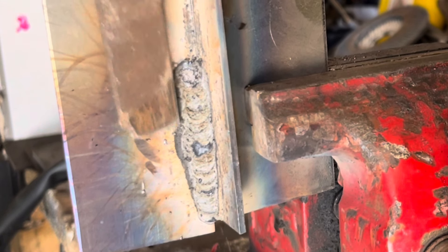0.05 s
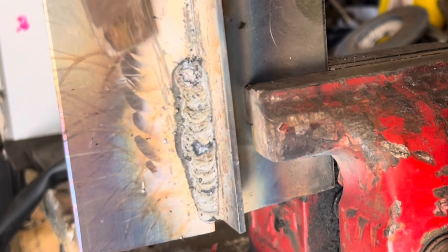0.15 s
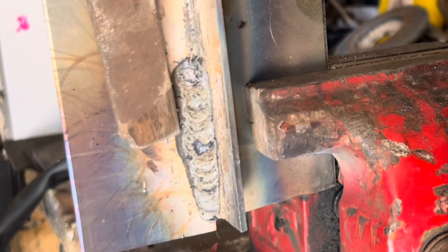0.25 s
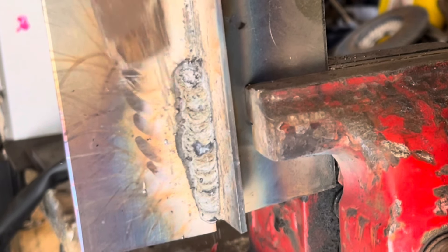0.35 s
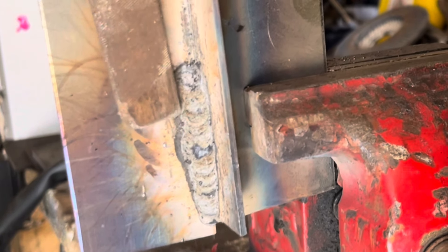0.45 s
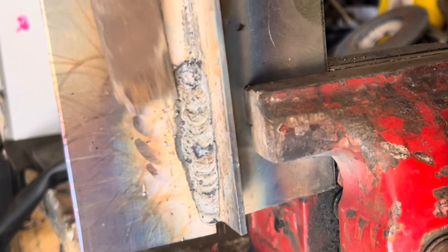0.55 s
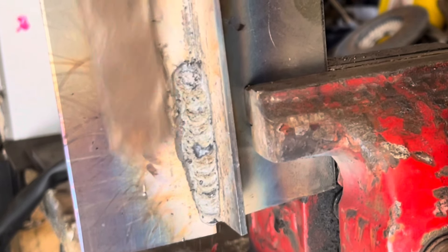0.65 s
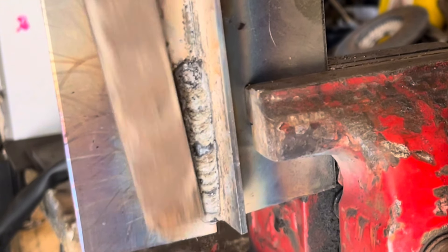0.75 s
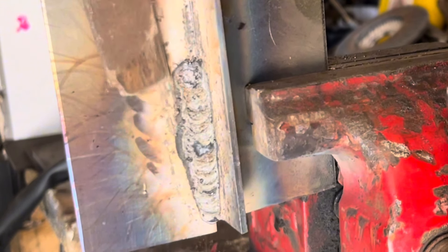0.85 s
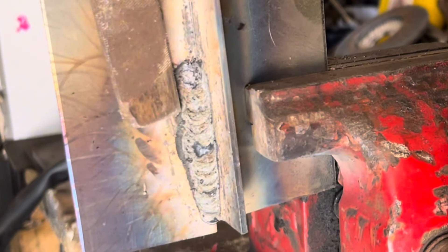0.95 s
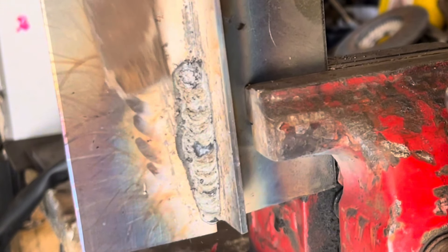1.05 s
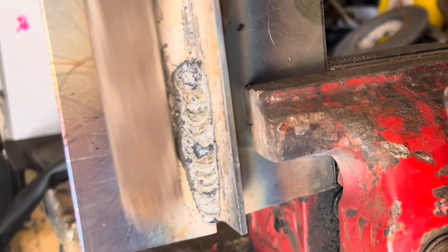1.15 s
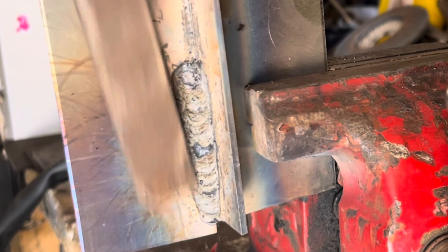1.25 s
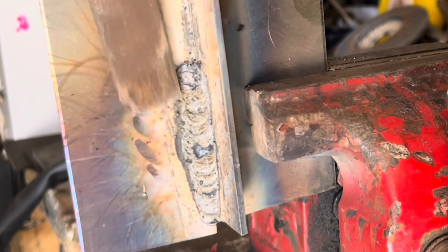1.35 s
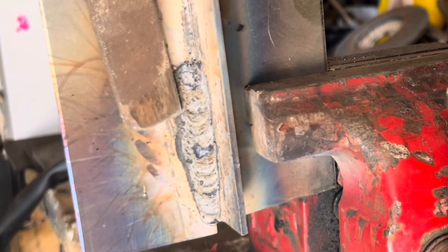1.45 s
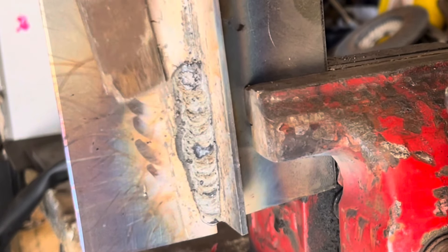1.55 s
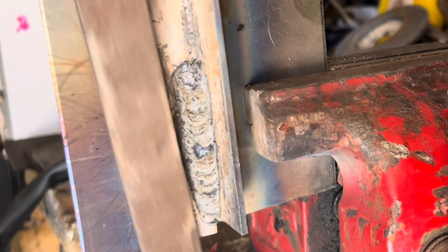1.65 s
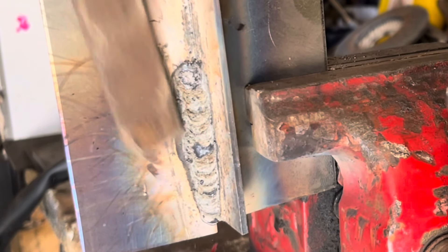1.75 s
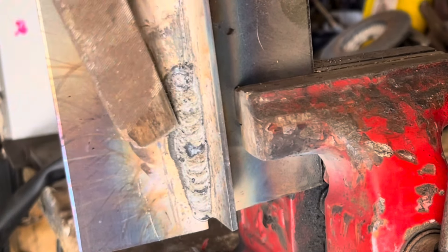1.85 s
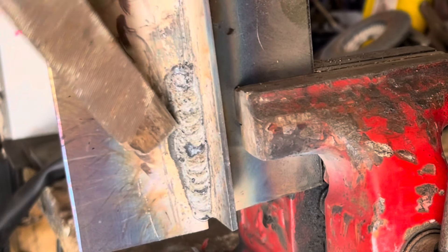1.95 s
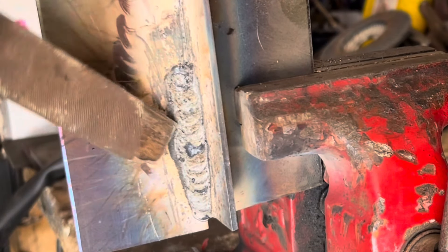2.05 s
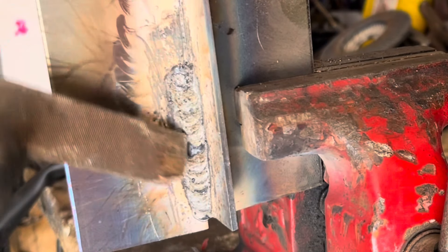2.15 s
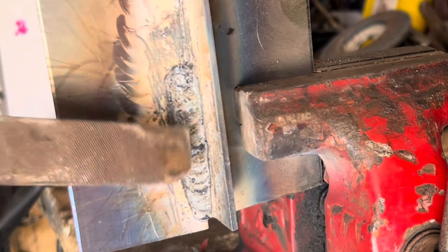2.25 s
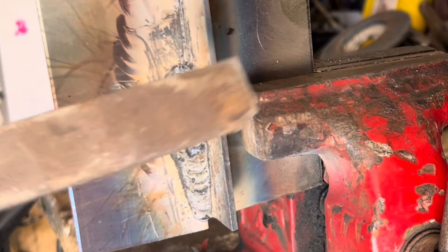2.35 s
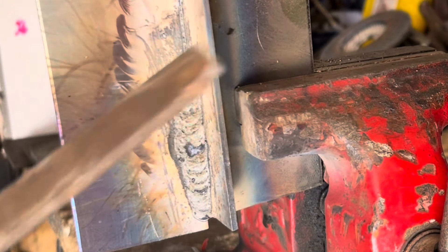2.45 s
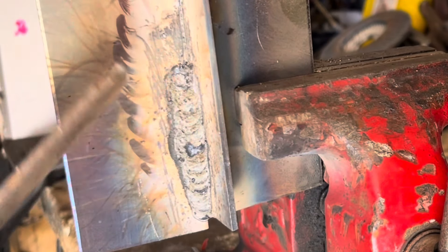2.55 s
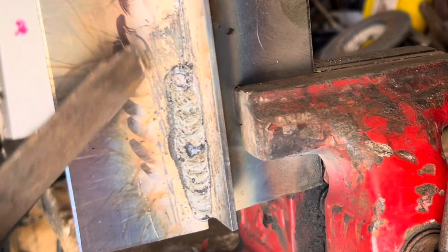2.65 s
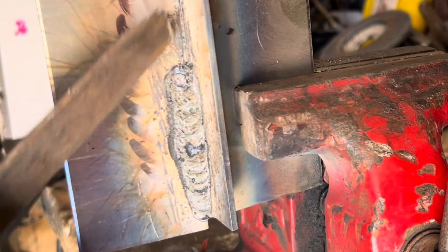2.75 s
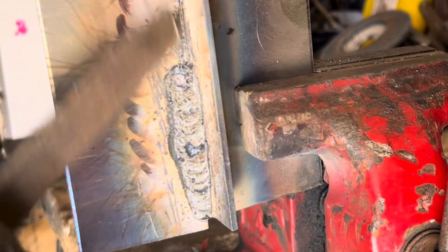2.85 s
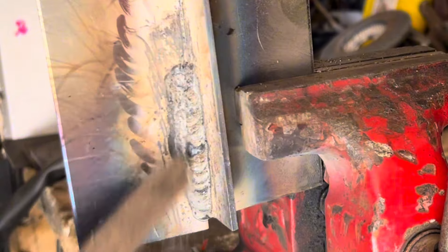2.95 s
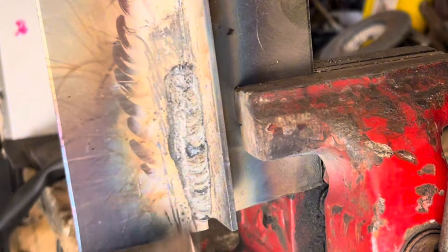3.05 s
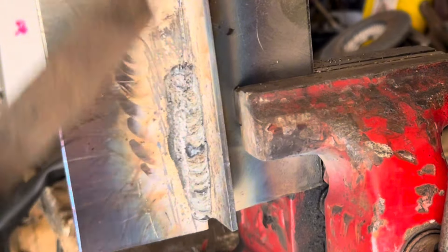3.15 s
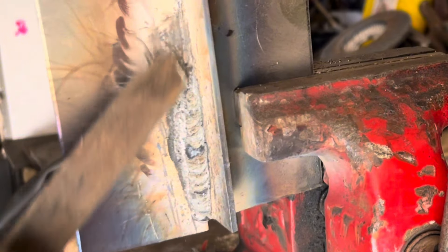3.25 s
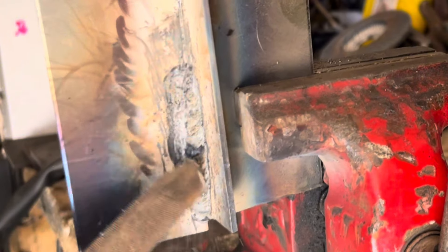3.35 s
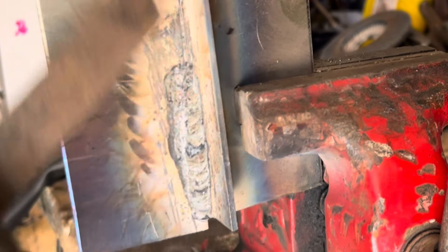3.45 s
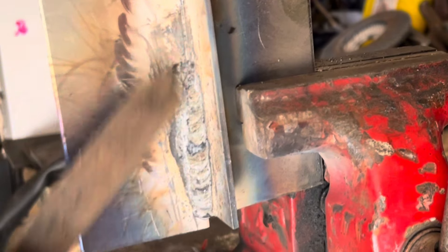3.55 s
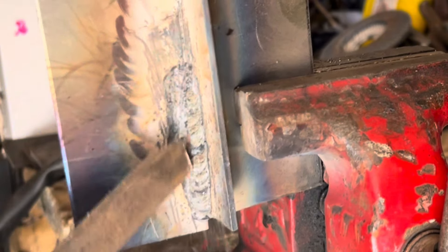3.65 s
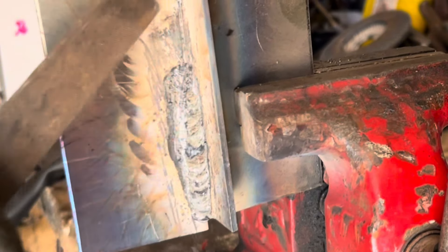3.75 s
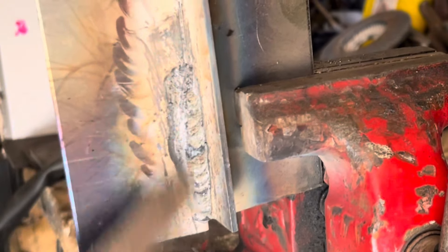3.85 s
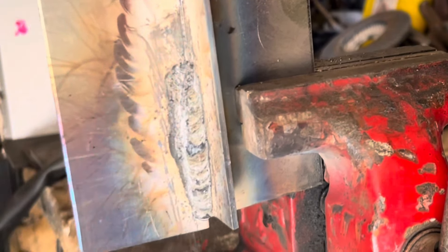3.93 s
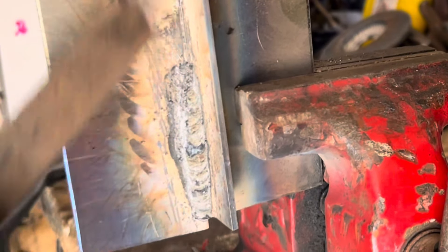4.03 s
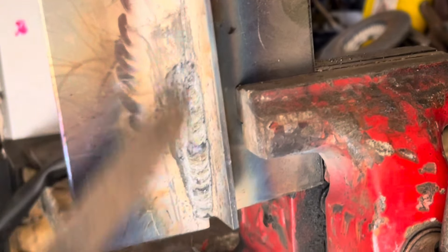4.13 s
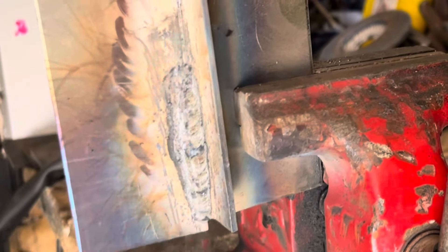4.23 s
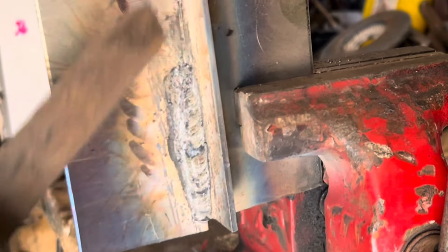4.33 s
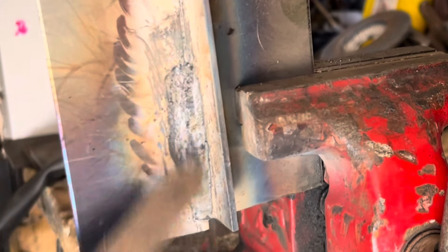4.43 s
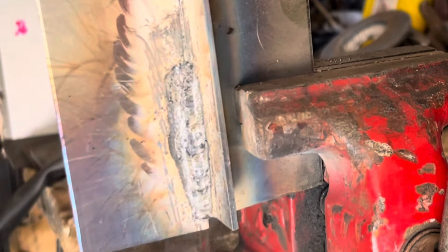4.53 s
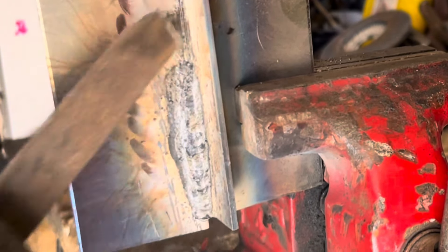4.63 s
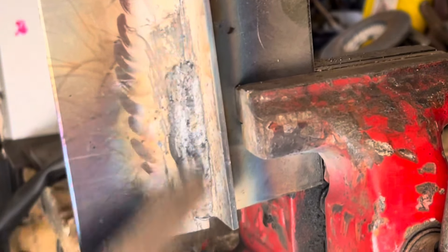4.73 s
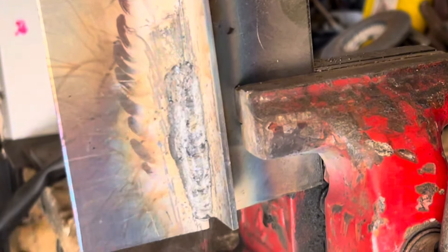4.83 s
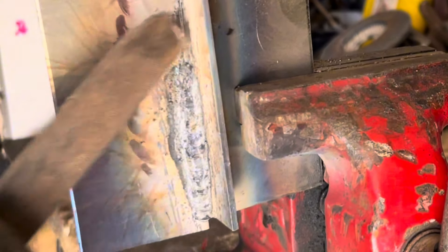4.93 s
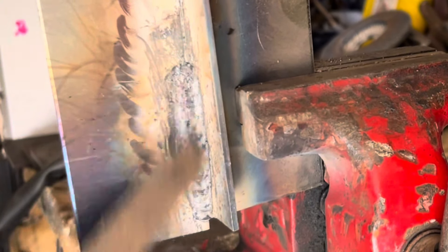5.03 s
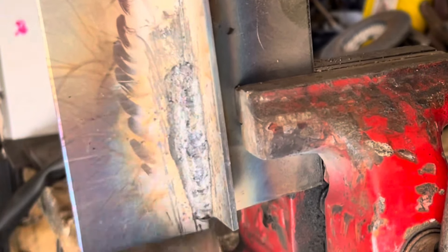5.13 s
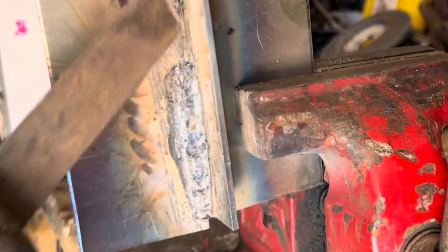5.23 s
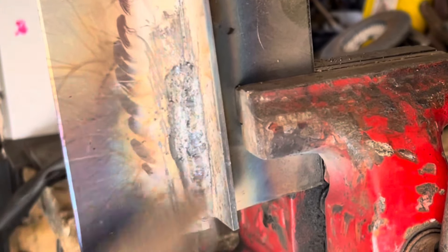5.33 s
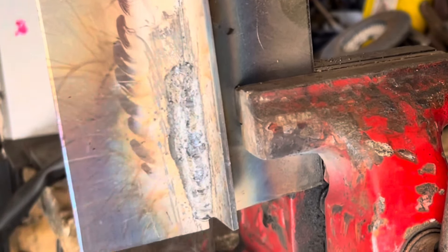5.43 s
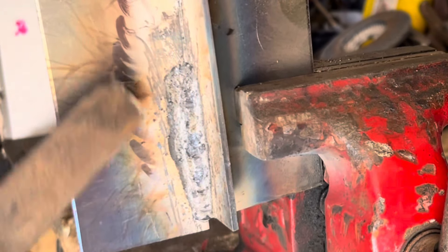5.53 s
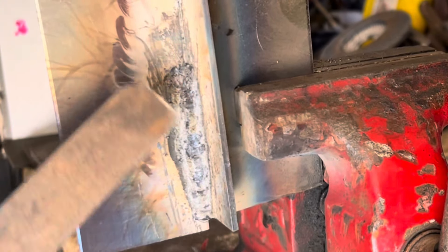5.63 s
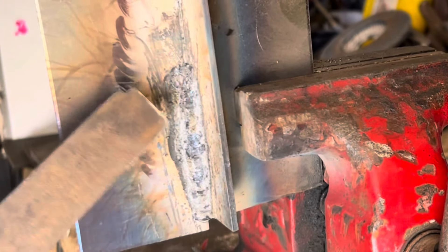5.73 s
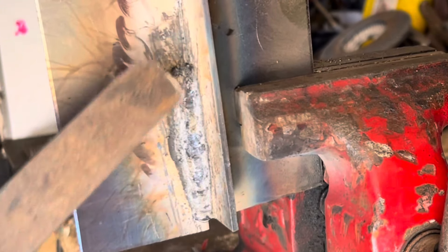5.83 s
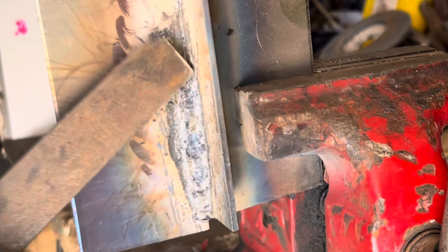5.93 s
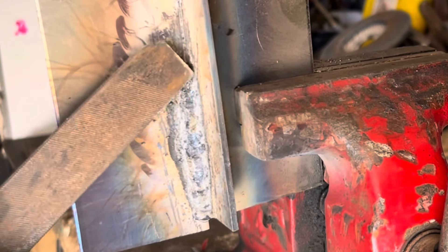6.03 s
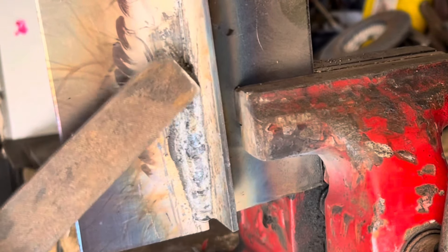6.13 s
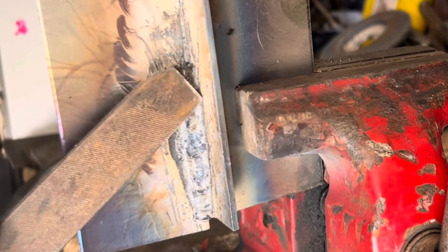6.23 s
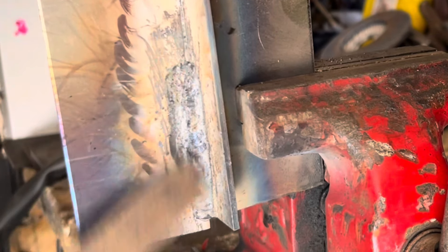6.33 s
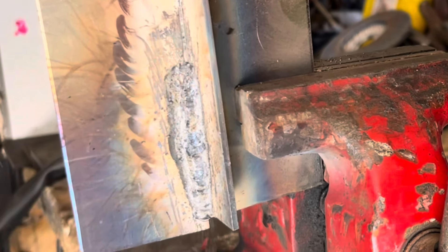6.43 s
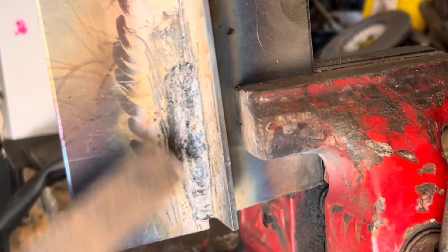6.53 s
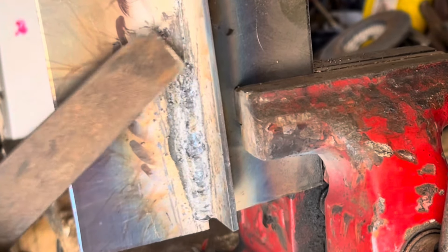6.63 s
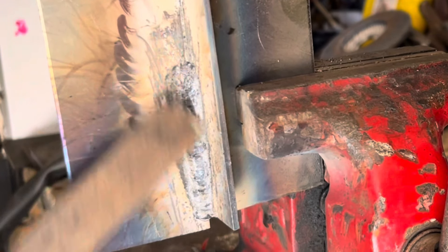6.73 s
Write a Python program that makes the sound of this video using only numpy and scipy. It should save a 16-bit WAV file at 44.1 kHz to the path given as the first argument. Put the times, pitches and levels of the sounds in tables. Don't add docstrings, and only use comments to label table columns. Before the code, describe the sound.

Close, gritty wire bristles rasp along and then across a clamped steel weld, clicking, knocking and ringing between pauses in a humming workshop.

```python
import sys
import numpy as np
from scipy import signal
from scipy.fft import rfft, irfft, next_fast_len
from scipy.io import wavfile
from scipy.ndimage import uniform_filter1d

SR = 44100
rng = np.random.default_rng(int(sys.argv[2]) if len(sys.argv) > 2 else 0)


def volts(x):
    e = np.asarray(x, float) / 20
    return 10 ** e


def output_pcm(signal):
    pcm = np.clip(np.atleast_2d(signal).T, -1, 1) * 32767
    wavfile.write(sys.argv[1], SR, np.round(pcm).astype(np.int16))


N = 298998
CLOCK = np.arange(N) / SR
TURN_S = 2.0
TILT = np.array([[-1], [0], [1]])


def evened(x):
    return x / np.sqrt(np.mean(x ** 2) + 1e-20)


def read(points, hz):
    f, value = np.transpose(points)
    return np.interp(np.log(hz + 1), np.log(f + 1), value)


def over_time(points):
    return volts(np.interp(CLOCK, *np.transpose(points)))


def by_hold(along_db, across_db):
    return np.where(CLOCK < TURN_S, volts(along_db), volts(across_db))


def colour(x, points, size=2048):
    log_gain = np.log(volts(read(points, abs(np.fft.fftfreq(size, 1 / SR)))))
    response = np.fft.ifft(np.exp(np.conj(signal.hilbert(log_gain)))).real
    response = response.reshape((1,) * (x.ndim - 1) + (-1,))
    return signal.oaconvolve(x, response, axes=-1)[..., :N]


def ring(x, hz, t60):
    r = 10 ** (-3 / (t60 * SR))
    w = 2 * np.pi * hz / SR
    return signal.lfilter([2 * (1 - r) * np.sin(w)], [1, -2 * r * np.cos(w), r * r], x)


def velvet(seconds, start, every):
    echoes = np.zeros((2, round(seconds * SR)))
    slots = np.arange(start, echoes.shape[1] - every, every)
    at = slots + rng.integers(0, every, (2, len(slots)))
    np.put_along_axis(echoes, at, rng.choice([-1., 1.], at.shape), 1)
    return echoes


def ports(x, left):
    # (f/Hz, right leads/radians)
    lead = [(60, .01), (600, .8), (1400, 1.4), (1800, -.3), (2600, -.9), (4100, -1.1), (5200, -.5),
            (5800, .4), (7000, 1.8), (7800, 2.7), (8800, 3.3), (10000, 5.2), (11700, 6.28), (13300, 7),
            (15200, 9.42)]
    size = next_fast_len(N)
    hz = np.fft.rfftfreq(size, 1 / SR)
    half = volts(read(left, hz) / 2) * np.exp(-.5j * read(lead, hz))
    return irfft(rfft(x, size) * np.array([half, 1 / half]), size)[:, :N]


def air():
    # (f/Hz, level/dB)
    hiss = [(40, -18), (90, 14.5), (600, 20.5), (1300, 15.5), (2000, 9), (4500, 6.5), (6000, 2.5),
            (7200, -3), (12000, -4.5), (15000, -7), (15600, -30), (17000, -50)]
    # (f/Hz, likeness)
    likeness = [(60, .95), (300, .6), (1000, .25), (6000, .3), (7500, .9), (15000, .9)]
    # (f/Hz, left over right/dB)
    balance = [(1500, -2.5), (2500, 2.5), (4500, 8.5), (6000, 9), (7200, 0)]
    frames, hz = N // 256 + 5, np.fft.rfftfreq(1024, 1 / SR)
    a, b, c, d, patches = rng.standard_normal((frames, 513, 5)).T
    patches = evened(uniform_filter1d(uniform_filter1d(patches, size=12, axis=0), size=14, axis=1))
    swells = evened(uniform_filter1d(patches[300], size=40)) * (hz > 7000)[:, None]
    same = np.clip(read(likeness, hz), -1, 1)[:, None]
    left = a + 1j * b
    z = np.array([left, same * left + np.sqrt(1 - same ** 2) * (c + 1j * d)])
    z *= volts(read(hiss, hz)[:, None] + 1.2 * patches + 1.6 * swells)
    noise = signal.istft(z, nperseg=1024, noverlap=768)[1][:, :N]
    return volts(-49.5) * ports(evened(noise), balance)


def hum():
    # (f/Hz, rms level/dB)
    orders = [(84.9, -63), (169.8, -64), (428, -66), (594.4, -52.5), (679.3, -64), (1019, -60),
              (1188.7, -56), (1358.5, -63), (1783, -63), (2377, -70), (2972, -65)]
    out = np.zeros((2, N))
    for (hz, db), (turn, lag, rate) in zip(orders, rng.random((len(orders), 3))):
        waver = np.sin(2 * np.pi * (rate * CLOCK * 3 + turn))
        port_lag = np.array([[1], [-1]]) * lag * hz / 25000
        tone = np.sin(2 * np.pi * (hz * CLOCK + turn + port_lag))
        out += np.sqrt(2) * volts(db + 2.6 * waver) * tone
    return out


def shake(force):
    # (f/Hz, level/dB)
    tone = [(15, -28), (35, -3), (70, 3.5), (110, -1), (200, -5.5), (400, -92.5)]
    lag_s, follows, rest_db = 0.013, 0.58, -82
    along_db, settles_db_per_s, across_db = -23, 7.6, -30.5
    keep = np.exp(-1 / (lag_s * SR))
    push = force[0] ** 2
    for _ in range(2):
        push = signal.lfilter([1 - keep], [1, -keep], push)
    level_db = np.where(CLOCK < TURN_S, along_db - settles_db_per_s * CLOCK, across_db)
    level = volts(level_db) * abs(push) ** (follows / 2) + volts(rest_db)
    both, apart = colour(rng.standard_normal((2, N)), tone, size=8192)
    return level * evened(both + volts(-14.5) * np.array([apart, -apart]))


def thuds():
    # (t/s, peak level/dB, f/Hz, length/s)
    pushes = [(0.0, -30, 127, 0.016), (.2, -31.5, 121.7, 0.033), (0.908, -37, 133, 0.033),
              (1.12, -31.5, 150, 0.042), (1.365, -33.5, 130, 0.034), (1.605, -32.5, 127.4, 0.033),
              (1.786, -45, 370, 0.048), (2.135, -42, 275, 0.022), (2.212, -48, 275, 0.054),
              (2.882, -28, 370, 0.043), (2.954, -30, 159.7, .04), (3.531, -25.5, 192, 0.045),
              (3.837, -22.5, 187.3, 0.041), (4.132, -27, 186.2, 0.037)]
    out = np.zeros(N)
    for s, db, hz, length in pushes:
        u = np.clip((CLOCK - s) / length, 0, 9)
        swell = np.e * 2 * u * np.exp(-2 * u)
        out += volts(db) * swell * np.sin(2 * np.pi * hz * CLOCK)
    return out


def room(x):
    # (f/Hz, t60/s)
    decay = [(60, 0.15), (300, 1), (1000, 0.68), (4000, 0.84), (8000, 0.29), (16000, 0.29)]
    turn, out = 2 * np.pi * .8 * CLOCK, 0
    for part in (np.cos(turn), np.sin(turn)):
        hz, t, z = signal.stft(velvet(.7, start=700, every=20), SR, nperseg=256)
        fade = volts(-60 * t / read(decay, hz)[:, None])
        tail = signal.istft(z * fade, SR, nperseg=256)[1]
        out = out + signal.fftconvolve((x * part)[None], tail / np.linalg.norm(tail[0]), axes=1)[:, :N]
    return volts(-19) * out


def bench(x):
    # (f/Hz, level/dB)
    scatter = [(60, -25), (200, -16), (400, 1.5), (1200, 3), (3000, 1.5), (5500, -.5), (7500, -5),
               (15000, -10)]
    turn = np.cumsum(uniform_filter1d(rng.standard_normal(N), size=2000)) * .02
    fade = volts(-60 * np.arange(round(.03 * SR)) / SR / .035)
    out = 0
    for part in (np.cos(turn), np.sin(turn)):
        echoes = velvet(.03, start=20, every=40) * fade
        out = out + signal.oaconvolve((x * part)[None], echoes / np.linalg.norm(echoes[0]), axes=1)
    return colour(out, scatter)


def taps():
    # (t/s, peak level/dB, knock f/Hz, fall/dB per 8.5 ms)
    knocks = [
        (.055, -34, 620, 2.5),
        (.492, -41, 840, 5.5),
        (.545, -41.5, 836, 1.5),
        (1.762, -28.5, 657, 4),
        (2.134, -42, 630, 2),
        (2.174, -38, 644, 7),
        (5.949, -40, 830, 8),
        (6.119, -39.5, 780, 1.5),
        (6.148, -40, 780, 4),
        (6.664, -32, 875, 10),
    ]
    out, t = np.zeros(N), np.arange(4000) / SR
    for (s, db, hz, fall_db), jostle in zip(knocks, rng.standard_normal((len(knocks), len(t)))):
        shape = volts(db + 9.0 - fall_db * t / 0.0085) * (1 - np.exp(-t / 0.0052))
        out[round(s * SR):][:len(t)] += evened(ring(jostle, hz, t60=0.014)) * shape
    return out


def twangs():
    # (t/s, peak level/dB)
    plucks = [(0.0677, -31), (0.0957, -35), (0.13, -37), (0.323, -37), (0.488, -26), (0.529, -40),
              (0.5856, -36), (0.731, -27), (0.7894, -42), (0.892, -34), (3.337, -25), (3.671, -32)]
    out, t = np.zeros(N), np.arange(3000) / SR
    tone = np.sin(2 * np.pi * 5480 * t) + .6 * np.sin(2 * np.pi * 5590 * t)
    for s, db in plucks:
        shape = volts(db - 1.5 - 60 * t / 0.06) * (1 - np.exp(-t / .002))
        out[round(s * SR):][:len(t)] += shape * tone
    return out


def snaps():
    # (t/s, peak level/dB)
    cracks = [(0.0936, -18), (0.2012, -1.5), (0.2376, -37), (0.296, -19), (0.3108, -25), (0.42, -9),
              (0.4887, -42), (0.5056, -35), (0.556, -20), (0.6525, -20), (0.895, -17), (1.1214, -8),
              (1.2968, -15), (1.3612, -16), (1.3773, -16.0), (1.5151, -29), (1.5861, -18.5), (1.606, -8),
              (1.6177, 1), (1.759, -23), (2.172, -25), (2.8765, -20), (2.9124, -22.0), (2.9641, -24),
              (3.2073, -10), (3.2799, -19), (3.5038, -18), (3.513, -5), (3.5446, -5.5), (3.7939, -20),
              (3.8241, -13), (4.0906, -22), (4.1357, -16), (4.3802, -25), (4.4359, -15), (4.662, -25),
              (4.7137, -29), (4.7335, -23), (4.8749, -30), (4.961, -21), (4.9974, -20), (5.0066, -20),
              (5.0439, -29), (5.2676, -24), (5.283, -33), (5.9461, -31.5), (6.112, -37), (6.3184, -26),
              (6.3287, -24), (6.3537, -14), (6.363, -9), (6.3982, 0), (6.6622, -37.0), (6.737, -31)]
    # (f/Hz, level/dB)
    tone = [(800, -3), (3000, -27), (7000, 0), (12500, 2.5), (16000, 1), (16700, -38)]
    out, t = np.zeros(N), np.arange(300) / SR
    shape = np.exp(-t / 0.0011) * (1 - np.exp(-t / .0002))
    for (s, db), grit in zip(cracks, rng.choice([-1., 1.], (len(cracks), len(t)))):
        out[round((s - .0004) * SR):][:len(t)] += volts(db - 2.5) * grit * shape
    return colour(out, tone)


def free_ringing():
    # (t/s, then level/dB of each of the four modes)
    releases = [(0.005, -33, -46, -38.5, -54), (0.21, -32.5, -37, -40, -47), (0.44, -42, -42, -56, -61),
                (0.71, -51, -34, -28, -52), (0.83, -52, -36, -33, -55), (0.905, -35, -40, -45, -51),
                (1.17, -38, -54, -24, -37), (1.31, -52, -40.5, -50, -42), (1.385, -27.5, -54, -40, -67),
                (1.631, -30, -34, -21, -38), (1.78, -56, -41, -48, -64), (1.87, -68, -60, -70, -75),
                (2.888, -19.5, -44, -49, -38), (2.989, -29.5, -43, -33, -35.5),
                (3.217, -24.5, -49, -34, -26.5), (3.28, -23.5, -45, -36.5, -38), (3.34, -46, -45, -31, -54),
                (3.521, -21, -57, -37, -27), (3.64, -41, -52, -53, -46.5), (3.8, -35, -32, -40, -35),
                (3.874, -21.5, -39.5, -30.5, -45), (4.097, -25, -37, -35, -46),
                (4.18, -25, -33.5, -19.5, -32), (4.389, -19, -42, -23, -37), (4.456, -22.5, -33, -25, -39),
                (4.667, -42, -43, -32, -39), (4.743, -16, -41, -28, -48), (4.965, -62, -48, -22, -48),
                (5.005, -31, -31, -18, -42), (5.07, -30, -37.5, -25, -49), (5.272, -15.5, -54, -35, -49),
                (5.355, -25.5, -34.5, -32, -42), (5.6, -70, -51.5, -83, -73), (6.105, -41, -67, -62, -67),
                (6.142, -42, -67, -55, -62), (6.17, -68, -70, -70, -67), (6.42, -34, -40.5, -51, -41),
                (6.75, -23, -51, -23, -47)]
    # (f/Hz, t60/s)
    modes = [(1959, .36), (2681, .9), (7432, .23), (9622, .32)]
    rows, out = np.array(releases), np.zeros(N)
    last = np.maximum(np.searchsorted(rows[:, 0], CLOCK) - 1, 0)
    since = CLOCK - rows[last, 0]
    for k, (hz, t60) in enumerate(modes):
        level = volts(rows[last, k + 1] + 1.5 - 60 * since / t60)
        out += uniform_filter1d(level, size=round(.006 * SR)) * np.sin(2 * np.pi * hz * CLOCK)
    return out


def bending_ring(scrape):
    # (f/Hz, t60/s)
    modes = [(1958, .08), (2681, .1), (287, .4), (1346, .35), (7432, .07), (7960, .2), (9622, .08),
             (11385, .1), (14190, .2), (2998, .17), (3316, .5), (4409, .6)]
    # (brushing along/dB, brushing across/dB, share of the nearness to the edge followed)
    strength = [(3, 5, 0.05), (3, 3, 0.2), (2, 11, 0.082), (11, -5, -0.15), (6, 7, 0.3), (12, 19, .4),
                (5, 3, -.2), (9, 6, -0.2), (7, 9, -0.083), (-4, 6, 0.49), (-11, -1.5, 0.076), (-6, 3, -0.1)]
    # (t/s, level/dB)
    nearness = [(.1, -15), (.45, -3), (.7, 26), (1.2, -6), (1.7, 1), (2.9, 4), (3.25, -3), (3.55, -39.5),
                (3.85, 0), (4.15, 14), (4.45, 19), (4.75, 15), (5, 18), (5.3, 15), (5.6, -25), (6.3, 5)]
    # (t/s, level/dB)
    first_mode_level = [(0.0, 8), (0.198, 4.5), (.7, 4), (1.33, 4), (1.385, 18.5), (1.62, -17), (2.9, 13.5),
                        (3.25, 7.5), (3.6, 14.5), (3.8, 9), (3.869, 14.5), (4.16, 6), (4.4, 7), (4.75, 5), (5.3, 8),
                        (6.13, 20.5), (6.35, 5.5), (6.67, -13), (6.751, -13)]
    reach, out = over_time(nearness), np.zeros(N)
    mode_gains = [over_time(first_mode_level)] + [1] * len(modes)
    for (hz, t60), (along_db, across_db, share), left in zip(modes, strength, mode_gains):
        out += ring(scrape * left * reach ** share * by_hold(along_db, across_db), hz, t60)
    return out


def plate_ring(scrape):
    # (f/Hz, t60/s)
    modes = [(303, .12), (372, .12), (625, .035), (826, .07), (922, .05), (1158, .09), (1277, .06),
             (1515, .07), (3040, .025), (3530, .025), (3925, .04), (5970, .1), (6860, .02), (9130, .05),
             (10320, .09), (10900, .08), (12050, .1)]
    # (brushing along/dB, brushing across/dB, share of the spot followed)
    strength = [(9, 4, -0.52), (13.5, 6, -0.45), (9, 4, -0.75), (8.5, 5, -0.14), (6, 7.5, -0.7),
                (-15, -25.5, 0.16), (-17, 3, 1), (7.5, 2.5, 0.58), (0.5, -5.5, 1), (-12, -8, .3),
                (-28, 8, 0.012), (3, 5, -0.19), (-30, 4.5, 0.58), (-1, 7.5, -0.16), (5.5, -10, 0.23),
                (4.5, 7, -.3), (7, 10.5, 0.11)]
    # (t/s, level/dB)
    places = [(.2, -4.5), (.7, 1.5), (1.15, 0.5), (1.4, 5.5), (1.7, 3), (2.95, 0), (3.25, 6.5),
              (3.57, -3.5), (3.85, 7), (4.15, 1), (4.43, 4), (4.73, 6), (5.02, -1.5), (5.32, -3.5),
              (6.35, -3.5), (6.749, 1)]
    spot, out = over_time(places), np.zeros(N)
    for (hz, t60), (along_db, across_db, share) in zip(modes, strength):
        out += ring(scrape * spot ** share * by_hold(along_db, across_db), hz, t60)
    return out


def sweep(t, start, length, db, swell_db, bright_db, rule):
    level_db, rise, fall = np.array(rule)[:, :, None]
    progress = np.clip((t - start) / length, 0, 1)
    moving = db + swell_db * (progress - 1) + level_db + bright_db * TILT
    before, after = np.maximum(start - t, 0), np.maximum(t - start - length, 0)
    return volts(2 * (moving - rise * before - fall * after))


def hand():
    # (start t/s, length/s, end pressure/dB, swell over the sweep/dB, brightness/dB)
    along = [(0.0, 0.023, -36.5, 3, 2.5), (.055, 0.062, -30.5, 4, 0.5), (.192, 0.015, -18.5, 5, 1),
             (.307, 0.033, -29, -1.5, 1), (.417, 0.0083, -18.5, 3, 2), (.487, 0.012, -42, -3, -6),
             (.54, 0.033, -32.5, 3, 2.5), (.648, 0.046, -16, 4, 5.5), (.751, 0.07, -24, 4, 5.5),
             (.884, 0.0073, -22.5, -4.5, -1), (1.026, 0.024, -36, -2.5, 2.5),
             (1.117, 0.062, -25.5, -7, 0.5), (1.22, 0.084, -24, 3, 5), (1.358, 0.0092, -20.5, 6, 1),
             (1.482, 0.031, -33, 16, 3), (1.581, 0.068, -23.5, -3, 2), (1.69, 0.087, -28.5, -4.5, 5.5),
             (2.168, 0.0086, -36, 2, -1)]
    # (start t/s, length/s, end pressure/dB, swell over the sweep/dB, brightness/dB)
    across = [(2.885, 0.093, -17.5, 5.5, 3), (3.212, 0.064, -27, -9.5, 1), (3.278, 0.05, -22.5, 4.5, -2),
              (3.545, 0.074, -24, -3.5, -1.5), (3.80, 0.054, -12.5, 9.5, 1), (4.134, 0.032, -12, 1.5, 2.5),
              (4.415, 0.033, -15, -0.5, 2), (4.713, 0.03, -12.5, -3.5, 2.5), (4.997, 0.06, -16.5, -3, 2.5),
              (5.285, 0.055, -13, 7, 2), (5.5, 0.13, -54, 8, 17), (6.112, 0.059, -45, 2.5, 10),
              (6.262, 0.051, -23.5, 15, 2), (6.322, 0.043, -13.5, 6.5, 1.5), (6.405, 0.057, -37, -23.5, 1),
              (6.66, 0.016, -37.5, 3, 3), (6.728, 0.046, -17, 3, 1.5)]
    along_rule = [(2.83, 0.1, 10.1), (1100, 2900, 1150), (302, 800, 670)]
    across_rule = [(1.46, 0.44, 1.5), (900, 1400, 1503.5), (310, 536, 466)]
    # (from t/s, to t/s, body level/dB, scrape level/dB, fizz level/dB)
    drags = [
        (0.0, 0.756, -73, -39, -53),
        (2.125, 2.44, -79, -71, -44),
        (3.302, 4.974, -38.5, -72, -50),
    ]
    # (t/s, peak level/dB, fall/dB per 10 ms)
    landings = [(2.8707, -0.5, 8.5), (3.205, -1, 20), (3.501, 4, 24), (3.511, 0.5, 10), (3.7912, 4.5, 23),
                (3.786, 2, 9), (4.088, -5.5, 6.5), (4.378, -2, 8), (4.6577, -3.5, 9.5), (4.9558, 3.5, 20.5),
                (5.2662, -0.5, 31), (5.946, -30, 17), (6.396, 0, 17)]
    # (t/s, peak level/dB)
    catches_along = [(.0014, -30), (.1965, -6), (.213, -26), (.234, -10), (.3092, -37), (.4210, -5.5),
                     (.4884, -22), (.5557, -18), (.6515, -19), (.6803, -17), (.8103, -10), (.8934, 2),
                     (1.0356, -19), (1.1174, -22), (1.1394, -18), (1.2262, -29), (1.249, -26), (1.295, -6),
                     (1.377, -1), (1.5141, -36), (1.585, -9.5), (1.6125, -3.5), (1.6927, -14),
                     (1.7103, -25), (1.759, -29), (2.1705, -35)]
    # (t/s, peak level/dB)
    catches_across = [(2.947, -0.5), (3.276, -3.5), (3.324, -8.5), (3.398, -22.5), (3.42, -24),
                      (3.456, -20.5), (3.544, 0), (3.607, -21), (3.65, -24), (3.8611, 0.5), (4.1374, -23),
                      (4.2164, -11), (4.709, -6), (4.73, -6), (4.878, -36), (4.9968, 2.5), (5.327, -6),
                      (6.359, -1.5), (6.729, -7)]

    force = np.zeros((3, N))
    for start, end, *db in drags:
        force += volts(2 * np.array(db))[:, None] * ((CLOCK >= start) & (CLOCK < end))
    for rows, rule in ((along, along_rule), (across, across_rule)):
        for row in rows:
            n = slice(max(round((row[0] - .06) * SR), 0), round((row[0] + .35) * SR))
            force[:, n] += sweep(CLOCK[n], *row, rule) * volts(2 * -1)
    force = uniform_filter1d(force, size=40)

    # (t/s, peak/dB, fall/dB per 10 ms, brightness/dB, level/dB the force sinks to just before it)
    hits = [(s, db, fall_db, 5, -36) for s, db, fall_db in landings]
    hits += [(s, db, 18.5, 7, -15) for s, db in catches_along]
    hits += [(s, db, 29.5, 5.5, -15) for s, db in catches_across]
    t = np.arange(6000) / SR
    onset = (1 - np.exp(-t / .0006)) ** 2 * (1 - t / t[-1])
    for s, db, fall_db, bright_db, hold_db in sorted(hits):
        n = round(s * SR)
        force[:, max(n - 700, 0):n] *= volts(hold_db * np.linspace(0, 1, 700)[-n:])
        burst = volts(2 * (db - 7 - fall_db * t / .01)) * onset
        force[:, n:n + len(t)] += (volts(2 * bright_db * TILT) * burst)[:, :N - n]
    force[0] = np.roll(force[0], round(.003 * SR))
    return np.sqrt(abs(force))


def shifting(x):
    hz, t, z = signal.stft(x, SR, nperseg=256, noverlap=192)
    field = rng.standard_normal((len(t), len(hz))).T
    field = evened(uniform_filter1d(uniform_filter1d(field, size=4, axis=0), size=24, axis=1))
    return signal.istft(z * volts(1.8 * field), SR, nperseg=256, noverlap=192)[1][:N]


def bristles(force):
    # (f/Hz, level/dB)
    tone = [(30, -38), (90, -7.5), (170, -1), (600, 5), (1500, 2.5), (2300, -1.5), (4000, -7), (5500, -12),
            (8000, -11), (11000, -15), (13500, -18), (15300, -19), (15900, -24), (16600, -35)]
    slips_per_s, spread_db, clump_db = 9000, 2.5, 1.3
    draw = rng.random((4, N))
    size = volts(-spread_db * np.log(draw[0] + 0.0013))
    slips = size * np.sign(draw[1] - .5) * (draw[2] < slips_per_s / SR)
    clumps = evened(uniform_filter1d(uniform_filter1d(draw[3] - .5, size=250), size=120))
    slips = evened(slips * volts(clump_db * clumps))
    body, middle, fizz = (signal.sosfilt(signal.butter(2, edge, kind, fs=SR, output="sos"), slips * push)
                          for edge, kind, push in zip((1300, (1300, 7500), 7500), ("low", "band", "high"), force))
    return shifting(colour(body - middle + fizz, tone))


def scene():
    # (f/Hz, left over right/dB)
    balance = [(60, -.5), (640, -.8), (1400, -1), (2300, 4), (3500, 5), (6800, 2.2), (9000, 0)]
    force = hand()
    scrape = bristles(force)
    near = scrape + plate_ring(scrape) + twangs() + taps() + snaps()
    bell, free = bending_ring(scrape), free_ringing()
    brush = ports(near + bell + free, balance) + bench(near)
    wet = room(near + .5 * bell + .15 * free)
    return brush + wet + air() + hum() + shake(force) + thuds()


def starve(x):
    # (f/Hz, level/dB)
    mask = [(5500, -38), (7000, -10), (9000, -4), (13000, -8), (16000, -0.5)]
    # (f/Hz, level/dB)
    buried = [(6000, -66), (7600, -64), (9000, -58), (10500, -39), (13000, -41.5), (14500, -39),
              (16000, -42)]
    hz, _, z = signal.stft([x[0] + x[1], x[0] - x[1]], SR, nperseg=1024, noverlap=512)
    bands, centre = z[:, :512].reshape(2, 32, 16, -1), hz[8:512:16]
    fine = abs(bands) ** 2
    power = fine.mean(2, keepdims=True)
    near = uniform_filter1d(power.max(0), size=3, axis=0)
    loudest = uniform_filter1d(power.max((0, 1)), size=5)
    limit = near * volts(2 * read(mask, centre))[:, None, None]
    limit = limit + loudest * volts(2 * read(buried, centre))[:, None, None]
    treble = power[:, 8:].sum((0, 1))
    limit = limit * np.where(treble > 40 * np.roll(treble, 2), .03, 1)
    z[:, :512] = (bands * (power > limit) * (fine > limit * 0.45)).reshape(2, 512, -1)
    both, apart = signal.istft(z, SR, nperseg=1024, noverlap=512)[1][:, :N]
    return np.array([both + apart, both - apart]) / 2


def top_cut(x):
    return signal.sosfilt(signal.butter(12, 16440, fs=SR, output="sos"), x)


def record(dry):
    limited = np.tanh(dry)
    return top_cut(starve(limited))


dry = scene()
out = record(dry)
output_pcm(out)
```